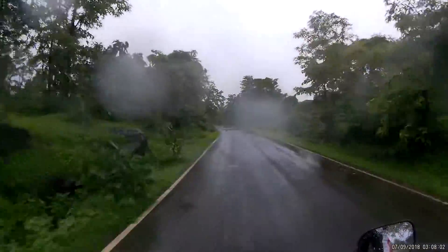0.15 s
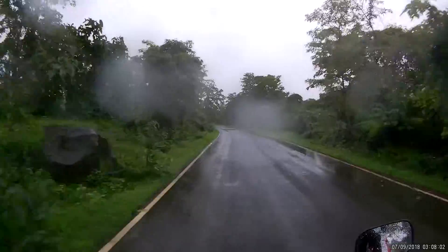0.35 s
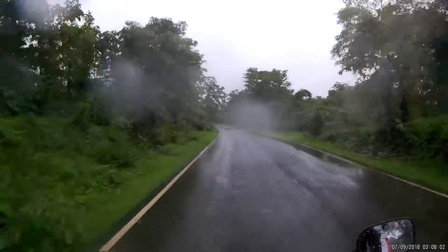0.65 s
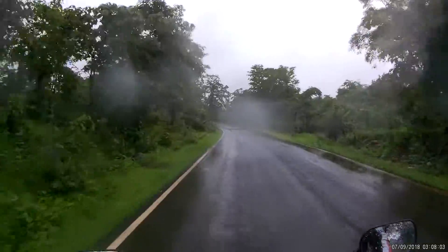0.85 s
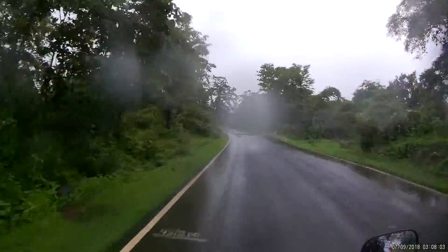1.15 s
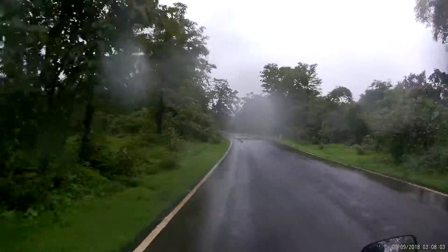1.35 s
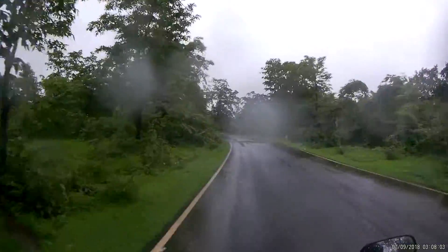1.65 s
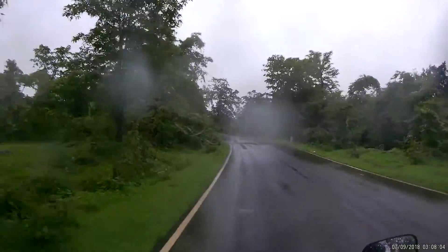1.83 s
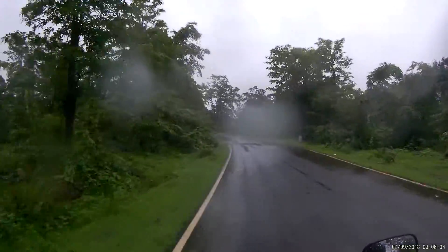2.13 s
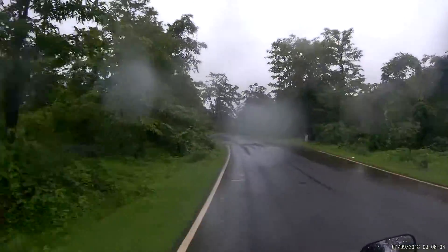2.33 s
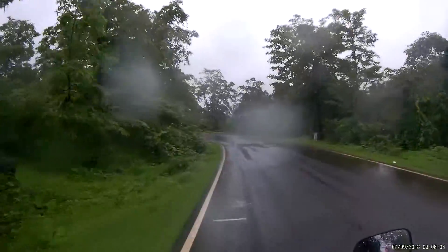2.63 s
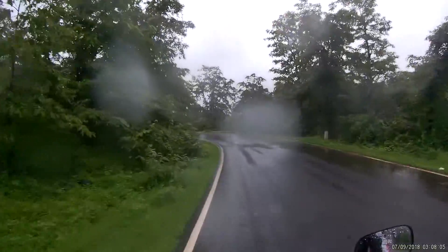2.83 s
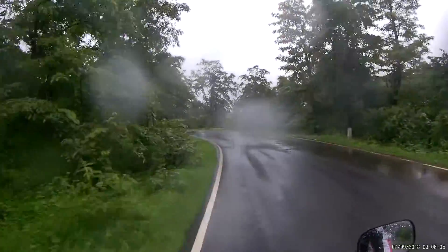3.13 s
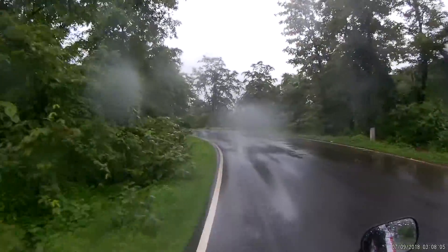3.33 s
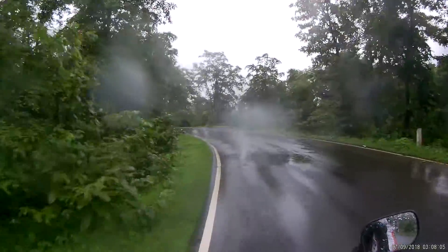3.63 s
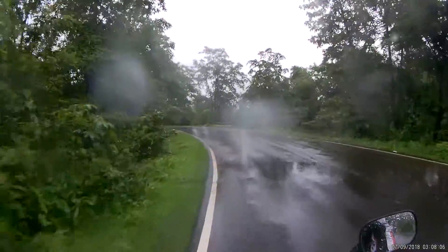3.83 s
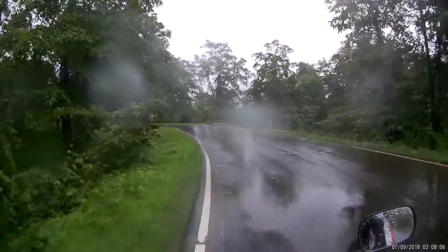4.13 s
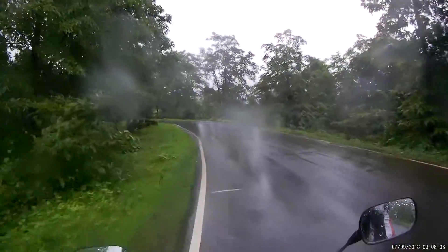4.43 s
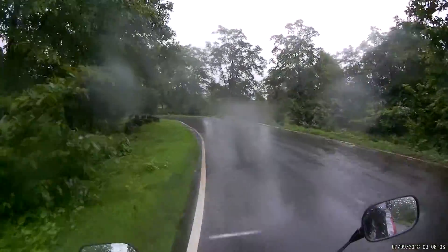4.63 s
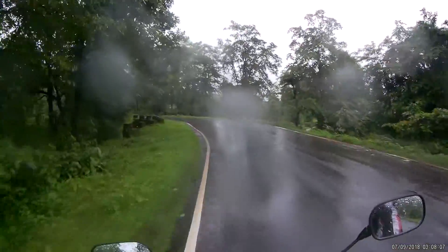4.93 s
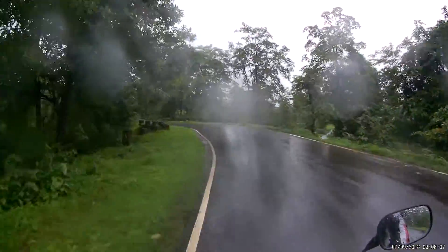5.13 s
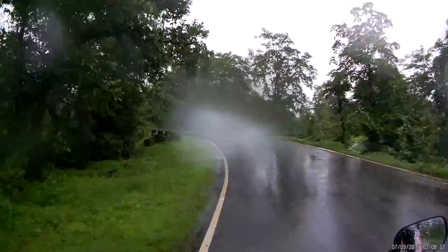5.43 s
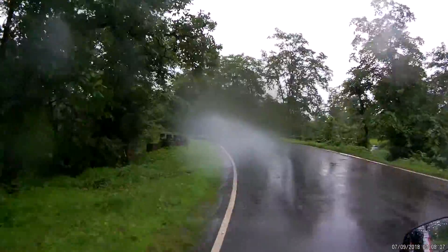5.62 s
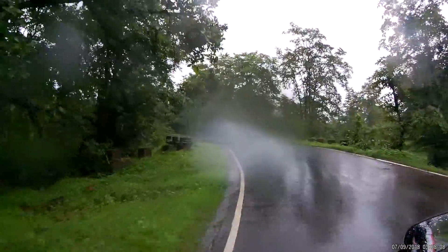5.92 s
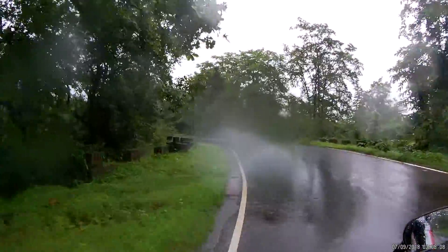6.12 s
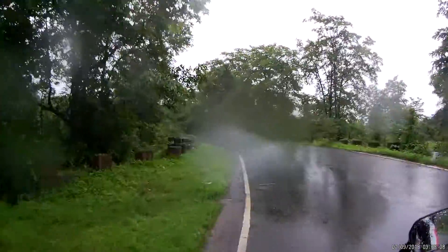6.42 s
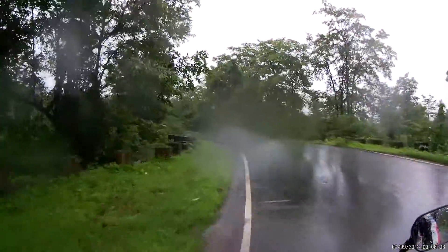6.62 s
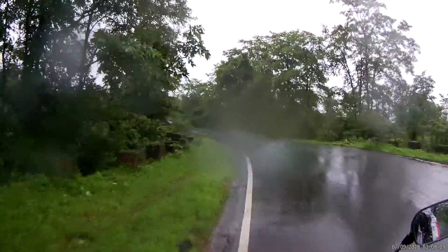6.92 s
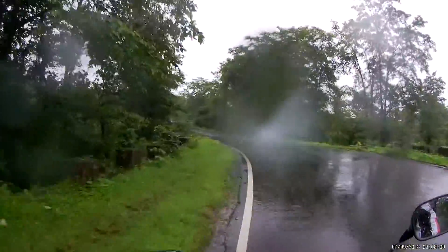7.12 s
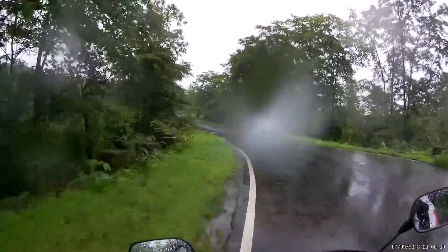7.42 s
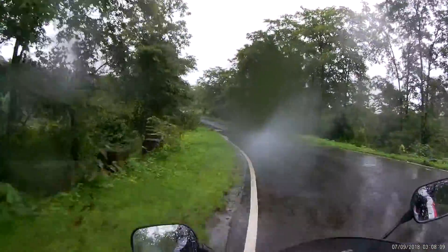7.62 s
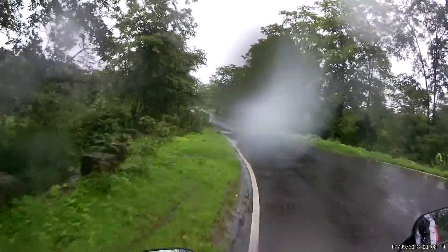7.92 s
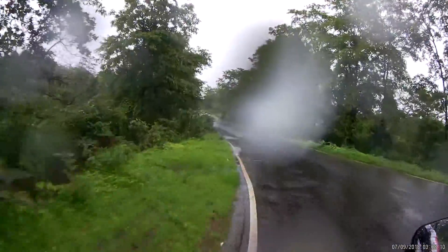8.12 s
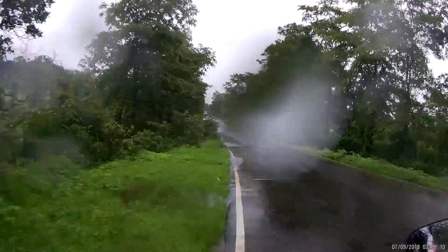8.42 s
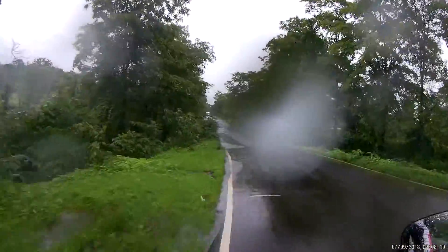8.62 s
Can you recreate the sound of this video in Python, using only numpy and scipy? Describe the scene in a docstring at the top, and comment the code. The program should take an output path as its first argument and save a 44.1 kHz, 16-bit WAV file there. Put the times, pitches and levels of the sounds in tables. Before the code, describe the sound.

Very close, dry microphone within a plastic case on a motorcycle riding a wet forest road. Hard bright drops crack against the case, thickest just after one second, over pattering spray, wet tyre hiss and lumpy muffled wind. A thin wavering gear tone falls and fades during coasting. After a quiet middle, throttle brings rougher clatter, a low hum and a fuzzy higher note beneath scattered ticks.

```python
"""Motorcycle in the rain, from inside a camera housing

One microphone sits inside a closed plastic housing on a motorcycle, on a wet road in rain.
Drops tick sharply on the housing, ringing its modes, over a patter of fine spray and tyre hiss.
Shaped noise makes the muffled wind, and the clatter of rain and engine together in two low modes.
The bike coasts into a bend with a sinking gear whine, a wavering sine; then the engine pulls again
with a hum and a fuzzy higher note."""
import sys
import numpy as np
from scipy import signal
from scipy.fft import rfft, irfft
from scipy.io import wavfile

SR = 44100
rng = np.random.default_rng(int(sys.argv[2]) if len(sys.argv) > 2 else 0)


def wav_out(sig):
    """Save sig, one row per channel (or a flat mono array), as 16-bit PCM at SR to the path in sys.argv[1]."""
    wavfile.write(sys.argv[1], SR, np.round(np.clip(np.atleast_2d(sig).T, -1, 1) * 32767).astype(np.int16))


N = 386316

# resonances of the plastic housing, before each landing spot alters them: (centre_hz, width_hz, gain_db)
HOUSING_MODES = [(1169, 53, -3.5), (1350, 137, -1), (1659, 56, 0.5), (1907, 390, -6.5), (2585, 180, -2),
                 (3234, 193, -4.5), (3976, 180, -1), (5660, 230, -2.5), (6300, 200, -4.5),
                 (7440, 290, -5.5), (8940, 710, -7.5), (9200, 326, -1), (11630, 620, -13),
                 (15700, 800, -16.5)]


def amp(db):
    """Decibels to gain."""
    return 10 ** (np.asarray(db) / 20)


def unit(x):
    """Scales to rms 1."""
    return x / np.sqrt(np.mean(x ** 2) + 1e-20)


def follow(rows):
    """The columns of a curve (time in seconds first), joined by straight lines at every sample."""
    seconds, *columns = np.transpose(rows)
    return [np.interp(np.arange(N) / SR, seconds, column) for column in columns]


def add(mix, start_s, sound):
    """Mixes a sound in at its start time, cut off at the end of the mix."""
    part = mix[max(round(start_s * SR), 0):][:len(sound)]
    part += sound[:len(part)]


def drift(edge_hz):
    """Random wandering of rms 1, smoothed above edge_hz."""
    f = np.fft.rfftfreq(N, 1 / SR)
    smoothed = rfft(rng.standard_normal(N)) / (1 + (f / edge_hz) ** 4)
    return unit(irfft(smoothed, N))


def resonance(f, hz, width_hz):
    """Response of one damped mode, gain 1 at its centre."""
    return 1j * f * width_hz / (hz ** 2 - f ** 2 + 1j * f * width_hz)


def causal(db):
    """Minimum-phase response with this gain: it rings only after the blow."""
    cepstrum = irfft(np.log(amp(db)))
    half = len(cepstrum) // 2
    cepstrum[1:half] *= 2
    cepstrum[half + 1:] = 0
    return np.exp(rfft(cepstrum))


def housing_db(f, weights_db, wall_db=-15.0, damping=1):
    """Gain of the housing: modes widened by damping, plus sound that passes straight through the wall."""
    power = amp(wall_db) ** 2 * f ** 2 / (f ** 2 + 140 ** 2)  # the wall passes little deep bass
    for (hz, width_hz, gain_db), weight_db in zip(HOUSING_MODES, weights_db):
        mode = amp(gain_db + weight_db) * resonance(f, hz, width_hz * damping)
        power = power + abs(mode) ** 2
    return 10 * np.log10(power + 1e-9)


def patter(hits_per_s, flurry, spread_db, spots=12):
    """Droplets of uneven size land on several spots of the housing, each with its own ring."""
    out, f = np.zeros(N), np.fft.rfftfreq(1024, 1 / SR)
    for _ in range(spots):
        lands = rng.random(N) < flurry * hits_per_s / spots / SR
        size_db = spread_db * np.minimum(rng.exponential(1, N), 3)
        weights_db = 3 * rng.standard_normal(len(HOUSING_MODES))
        ring = irfft(causal(housing_db(f, weights_db, damping=1.08)))
        splat = rng.standard_normal(len(ring)) * np.exp(-np.arange(len(ring)) / SR / 0.0014)
        droplet = unit(np.convolve(ring, splat))
        out += signal.oaconvolve(lands * amp(size_db), droplet)[:N]
    return unit(out)


def spray(level_db, hiss_db=-3, mist_db=-5, mist_per_s=260, fleck_db=6.0, fleck_per_s=20,
          spread_db=1.5, swell_db=1.25, fizz_db=-6):
    """Tyre hiss, dense mist and flurries of small droplets, all coloured by the housing modes."""
    f = np.fft.rfftfreq(N, 1 / SR)
    through_housing = amp(housing_db(f, np.zeros(len(HOUSING_MODES))))
    hiss = irfft(rfft(rng.standard_normal(N)) * through_housing, N)  # tyres on wet tarmac
    flurry = np.exp(0.41 * drift(17))  # crowds and thins the droplets
    mist = patter(mist_per_s, flurry, spread_db)
    flecks = patter(fleck_per_s, flurry, spread_db)
    fine = amp(hiss_db) * unit(hiss) + amp(mist_db) * mist
    # hiss and mist get a bright fizz that the flecks lack
    fizz = 1 + amp(fizz_db) * resonance(f, 9700, 600)
    fine = irfft(rfft(fine) * fizz, N)
    return amp(level_db + swell_db * drift(71)) * (fine + amp(fleck_db) * flecks)


def wind(level_db, trim_db=1, gust_db=-1.7):
    """Air buffets the closed housing: a dull, lumpy rumble of shaped noise."""
    # tone of the wind heard inside, before the treble roll-off below: (pitch_hz, gain_db)
    wind_tone = [(20, -4), (55, -3), (85, 3.5), (140, -4), (290, 1), (560, -3), (750, -5), (1100, -11.5),
                 (2500, -25)]
    f = np.fft.rfftfreq(N, 1 / SR)
    hz, gain_db = np.transpose(wind_tone)
    colour_db = np.interp(np.log(f + 1), np.log(hz), gain_db)
    colour_db -= 20 * np.log10(1 + (f / 4000) ** 2)
    rumble = unit(irfft(rfft(rng.standard_normal(N)) * amp(colour_db), N))
    return amp(level_db + trim_db + gust_db * drift(14)) * rumble


def clatter_and_engine(level_db, clatter_db=-2, pulse=0.22, hum_db=-2, note_db=11):
    """Rain and engine clatter together in two low modes of the housing; throttle adds hum and note."""
    # engine under throttle, before hum_db and note_db: (time_s, hum_hz, level_db)
    throttle = [(5.3, 195, -97), (6.2, 202.5, -77), (6.75, 210.3, -73), (7.3, 214.6, -62), (8, 216, -61.5),
                (8.76, 215.7, -69)]
    f = np.fft.rfftfreq(N, 1 / SR)
    hum_hz, pull_db = follow(throttle)
    phase = 2 * np.pi * np.cumsum(hum_hz * (1 + 0.0057 * drift(7.4))) / SR
    # the clatter throbs at a sixth of the hum's pitch
    rattle = rng.standard_normal(N) * (1 + pulse * np.cos(phase / 6))
    modes = amp(-2) * resonance(f, 1248, 240) ** 2 + resonance(f, 1648, 157) ** 2
    clatter = unit(irfft(rfft(rattle) * modes, N))
    hum = unit(np.sin(phase) * (.5 + drift(8.1)))
    # a note at six times the hum's pitch, blurred by two randomly wandering halves
    note = unit(drift(55) * np.sin(6 * phase) + drift(55) * np.cos(6 * phase))
    pull = amp(hum_db) * hum + amp(note_db) * note
    return amp(level_db + clatter_db) * clatter + amp(pull_db) * pull


def drops(spot_db=2.0, detune=0.037, ring_db=0, ring_q=4, splat_s=0.00053, splat_db=4,
          wet_s=0.0056, wet_db=-13, size=2048):
    """Each drop strikes, flattens within a millisecond or two and rings the housing where it lands."""
    # larger drops; body (1-2 kHz) and splash (treble) are relative band levels:
    # (touch_s, level_db, body_db, splash_db, ring_hz)
    drop_rows = [(0.0407, -3, -25.5, -14, 9000), (0.0646, -5.5, -22.5, -9, 9130),
                 (0.0991, -4, -25, -19.5, 5400), (0.1419, -11, -26, -16, 9420),
                 (0.1757, -8.5, -14.5, -19, 3820), (0.184, -5.5, -25.5, -17.5, 2680),
                 (0.2443, 0, -34, -13, 5850), (0.2773, -7.5, -15, -17.5, 1640),
                 (0.4256, -8, -13.5, -13.5, 1680), (0.4869, -0.5, -18, -13, 9300),
                 (0.4909, -2, -19, -9.5, 9470), (0.5658, -10.5, -18.5, -9, 1610),
                 (0.627, -3.5, -17, -13, 1620), (0.7223, -6, -13, -12.5, 1670),
                 (0.8154, -10, -25, -9, 9450), (0.8913, -4.5, -16.5, -11, 1700),
                 (0.988, -1, -13.5, -24, 1700), (1.0874, -5.5, -18.5, -10, 5950),
                 (1.0954, 0.5, -21, -5, 9100), (1.126, -6, -19, -8, 9300), (1.1384, 1.5, -20, -10, 9350),
                 (1.1761, 2, -21, -8.5, 9700), (1.1902, -5, -19.5, -18, 4000),
                 (1.2168, -8.5, -13, -7, 9380), (1.2418, 0.5, -22.5, -17, 4050),
                 (1.264, -2.5, -18, -5, 8900), (1.2975, 3, -16, -18.5, 1540), (1.3259, 0.5, -19, -16, 5750),
                 (1.3658, -2, -17.5, -7.5, 9400), (1.5548, 0.5, -15.5, -14, 9200),
                 (1.6032, -6, -20, -10.5, 9500), (1.6527, -11.5, -23, -9.5, 9400),
                 (1.6809, -8, -19, -10.5, 9300), (1.8027, -13.5, -16, -17, 1440),
                 (1.8746, -2.5, -25.5, -9.5, 3980), (1.8856, -8, -25, -19, 4140),
                 (1.9415, -6.5, -21.5, -14.5, 9500), (1.9947, -6, -7.5, -4, 1270),
                 (2.3136, -8, -15.5, -15.5, 1610), (2.384, -12, -15, -8, 9300),
                 (2.4187, -1, -17, -11.5, 9200), (2.4371, -5.5, -16.5, -15.5, 4030),
                 (2.4984, -1.5, -16, -8.5, 8600), (2.5346, -9, -20.5, -17, 4100),
                 (2.6292, -6.5, -21.5, -12, 9100), (2.6564, 1.5, -20, -18, 4250),
                 (2.7358, -7.5, -19.5, -15.5, 2550), (2.799, -5, -17.5, -11.5, 9330),
                 (2.911, -7.5, -22.5, -15.5, 2400), (3.0718, -3.5, -17.5, -8.5, 8800),
                 (3.083, -7.5, -31, -3.5, 9000), (3.1346, -3, -17.5, -21.5, 2580),
                 (3.236, -5, -18.5, -14.5, 2560), (3.272, -14.5, -21, -19, 4040),
                 (3.4992, -4, -20.5, -12.5, 1900), (3.6977, -5.5, -18.5, -11, 3270),
                 (3.8763, -6, -11, -16, 1360), (3.899, -9.5, -22.5, -18, 2500),
                 (3.9548, -17, -17, -10, 9410), (3.9907, -14, -18, -16.5, 1870),
                 (4.0457, -21.5, -28, -21, 1170), (4.1138, -17, -12, -16, 1200),
                 (4.1543, -11, -18, -16, 4060), (4.2956, -17.5, -17, -19, 1340),
                 (4.4373, -22, -21, -13, 9570), (4.5043, -13.5, -15.5, -8, 9000),
                 (4.6391, -16, -10.5, -18, 1350), (4.777, -9.5, -18, -18, 2430),
                 (4.963, -20, -16, -11, 1400), (5.0529, -25, -23, -25, 2580), (5.1, -17, -22, -19.5, 5900),
                 (5.2159, -20.5, -12, -10.5, 1660), (5.305, -15, -15.5, -19, 4080),
                 (5.4548, -17.5, -20, -15, 9400), (5.473, -17, -17, -17, 1620),
                 (5.6141, -9, -14.5, -15, 1350), (5.7533, -7.5, -11, -17, 1340),
                 (5.7777, -10.5, -13.5, -22, 1360), (5.9194, -15, -18.5, -17.5, 1290),
                 (5.9869, -9.5, -18, -17, 1870), (6.0655, -8.5, -19, -24.5, 1850),
                 (6.1845, -17, -12.5, -21.5, 1660), (6.318, -12, -27, -19, 3980),
                 (6.3716, -16.5, -27, -18, 3980), (6.4312, -0.5, -28.5, -19, 3960),
                 (6.5028, -14.5, -21, -14, 1140), (6.6869, -5.5, -18.5, -16.5, 1330),
                 (6.8089, -15, -20, -17.5, 2500), (6.9662, -7.5, -10.5, -10.5, 1380),
                 (7.0609, -6, -2, -8, 1360), (7.111, -10, -30, -16, 4060), (7.2897, -12.5, -9.5, -15, 1750),
                 (7.4406, -7, -19, -28.5, 1470), (7.474, -0.5, -16, -16.5, 5660),
                 (7.6925, -12, -14.5, -16, 1370), (7.7713, -12, -12.5, -14, 1330),
                 (7.8154, -13.5, -26, -18.5, 1640), (8.0068, -15, -16.5, -21, 1180),
                 (8.375, -9.5, -25, -15.5, 3150), (8.3967, -10, -23, -21, 2590),
                 (8.6051, -13.5, -21.5, -12.5, 9360), (8.7299, -8.5, -19.5, -17.5, 1300)]
    # edges between thud, body, crack and splash: (edge_hz)
    band_edges = [150, 950, 2100, 7000, 16000]
    # where each of the four bands is adjusted: (centre_hz)
    band_centres = [850, 1250, 3800, 10000]
    contact_s = .0009  # from first touch to the full blow
    blow_s = 0.00031  # a tick holds the energy of its level kept up this long
    crack_db = -14  # 2-7 kHz, on the same scale as body and splash
    thud_db = -13.5  # below 1 kHz, against the body
    t, f, out = np.arange(size) / SR, np.fft.rfftfreq(size, 1 / SR), np.zeros(N)
    band = np.digitize(f, band_edges)
    # the blow carries the bass, the spatter the treble
    blow = np.sqrt(size) * (1 / (1 + 1j * f / 6000) + 1 / (1 + 1j * f / 450))
    spatter_highpass = (1j * f / (1j * f + 900)) ** 2
    for touch_s, level_db, body_db, splash_db, ring_hz in drop_rows:
        splat, wet = rng.standard_normal((2, size))
        flatten = t / (splat_s * amp(0.51 * (level_db + 6)))  # louder drops take longer to spread
        spatter = amp(splat_db) * unit(splat * np.sqrt(flatten) * np.exp(-flatten))
        # fragments crackle after the blow; cubing the noise makes it spiky
        spatter += amp(wet_db) * unit(wet * wet * wet * np.exp(-t / wet_s))
        force = blow + rfft(spatter) * spatter_highpass
        # each landing spot shifts the modes and weights them its own way
        shifted_f = f * (1 + detune * rng.standard_normal())
        weights_db = spot_db * rng.standard_normal(len(HOUSING_MODES))
        colour_db = housing_db(shifted_f, weights_db, wall_db=-19.5, damping=1.08)
        local_ring = 1 + amp(ring_db) * resonance(f, ring_hz, ring_hz / ring_q)
        spectrum = force * causal(colour_db) * local_ring
        # pull the band balance towards the drop's own, in two passes
        wanted_db = np.array([body_db + thud_db, body_db, crack_db, splash_db])
        for _ in range(2):
            has_db = 10 * np.log10(np.bincount(band, abs(spectrum) ** 2)[1:-1])
            balance_db = np.interp(np.log(f + 1), np.log(band_centres), wanted_db - has_db)
            spectrum = spectrum * causal(balance_db)
        tick = irfft(spectrum * 1j * f / (1j * f + 70))  # the small housing radiates no deep bass
        strength = np.sqrt(np.sum(tick ** 2) / (SR * blow_s))
        add(out, touch_s + contact_s, amp(level_db) * tick / strength)
    return out


def knocks(t60_s=0.034, upper_ratio=1.48, upper_db=-9):
    """A few drops set a panel ringing longer, in two decaying modes."""
    # lower mode of each ringing panel: (start_s, pitch_hz, level_db)
    knock_rows = [(.1845, 817, -26), (3.615, 1610, -28), (3.7013, 3200, -17.5), (4.048, 1170, -31.5),
                  (4.117, 1134, -31.5), (4.712, 1140, -32), (6.503, 765, -32.5), (6.73, 790, -36),
                  (8.008, 794, -28.5)]
    t, out = np.arange(SR // 10) / SR, np.zeros(N)
    for start_s, hz, level_db in knock_rows:
        phase = 2 * np.pi * hz * t
        ring = np.sin(phase) + amp(upper_db) * np.sin(upper_ratio * phase)
        add(out, start_s, amp(level_db - 60 * t / t60_s) * ring)
    return out


def gears(waver=0.0017, flutter=0.15):
    """The transmission whine, a sine of wavering pitch and level, sinks as the bike slows."""
    # whine of the gears: (time_s, pitch_hz, level_db)
    whine = [(.9, 647, -76), (1.5, 583, -55.5), (2.1, 557, -58), (2.6, 530.5, -61), (3.2, 504, -63),
             (3.75, 457, -62), (4.2, 432, -81)]
    hz, level_db = follow(whine)
    phase = 2 * np.pi * np.cumsum(hz * (1 + waver * drift(9.6))) / SR
    return amp(level_db) * unit(np.sin(phase) * (1 + flutter * drift(5.7)))


def scene():
    """One ride curve leads wind, spray and clatter; all layers meet at one microphone in the housing."""
    # wind rising and falling with the bike's speed, before wind() trims it: (time_s, level_db)
    ride = [(0.0, -48), (1.22, -50), (2.07, -55), (2.85, -55.5), (3.88, -58.5), (4.17, -61.5), (4.9, -64.5),
            (5.73, -63), (5.9, -60), (7.95, -56), (8.15, -57.5), (8.76, -56.5)]
    # showers of spray sweep over the housing, down to 1/e of their dB at the half length:
    # (middle_s, half_length_s, extra_db)
    showers = [(0.7, 0.23, 6.5), (1.127, 0.069, 5), (1.86, 0.069, 2), (2.54, 0.45, 3.5), (3, 0.22, 3.5),
               (3.84, 0.43, 1), (6.323, 0.19, 5.5)]
    spray_over_wind_db, clatter_over_wind_db = 4.5, 3.5  # before each layer's own trims
    pull_start_s, pull_rise_s, pull_db = 4.98, 0.85, 5.5
    t = np.arange(N) / SR
    (wind_db,) = follow(ride)
    spray_db = wind_db + spray_over_wind_db
    for middle_s, half_s, extra_db in showers:
        spray_db = spray_db + extra_db * np.exp(-((t - middle_s) / half_s) ** 2)
    # the throttle opens out of the bend and the clatter gets louder
    opening = np.clip((t - pull_start_s) / pull_rise_s, 0, 1)
    clatter_db = wind_db + clatter_over_wind_db + pull_db * opening
    mix = spray(spray_db) + wind(wind_db) + clatter_and_engine(clatter_db)
    mix += drops() + knocks() + gears()
    return mix[None]


def record(dry):
    """The hardest ticks overload the microphone and are rounded off; then the treble is cut at 16 kHz."""
    rounded = dry / (1 + (dry / .78) ** 6) ** (1 / 6)
    lowpass = signal.firwin(255, 16000, window=("kaiser", 9), fs=SR)
    return signal.oaconvolve(rounded, lowpass[None], "same")


dry = scene()
out = record(dry)
wav_out(out)
```